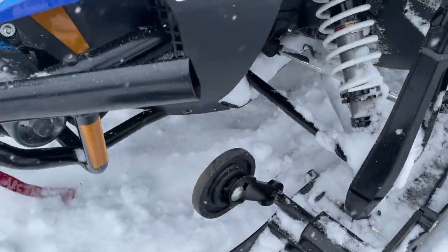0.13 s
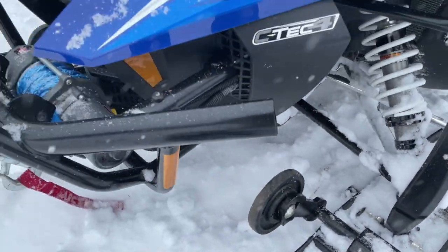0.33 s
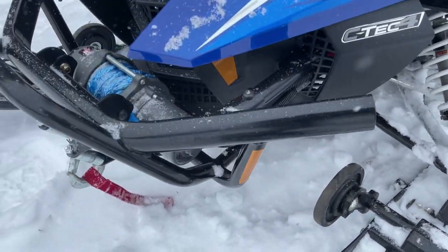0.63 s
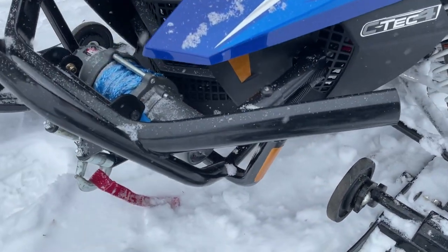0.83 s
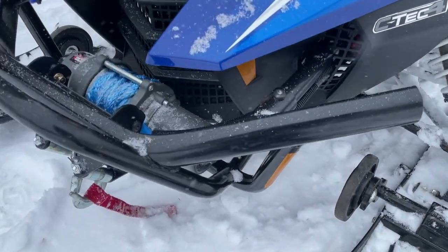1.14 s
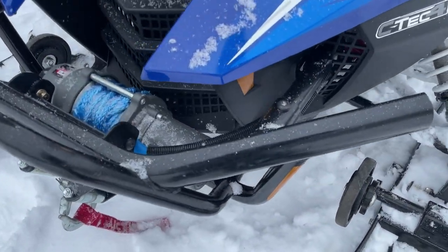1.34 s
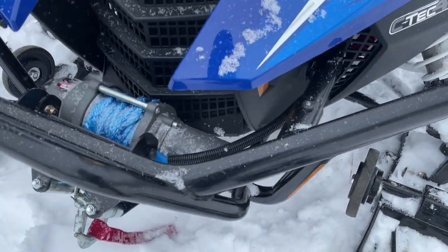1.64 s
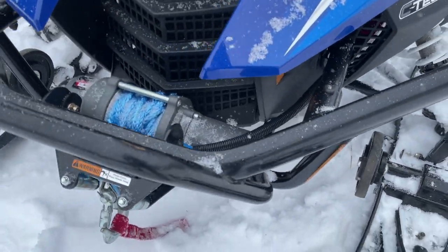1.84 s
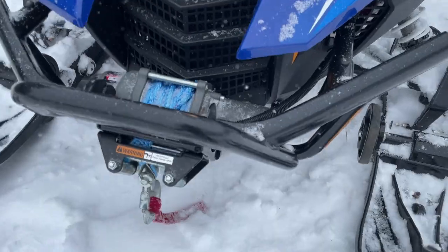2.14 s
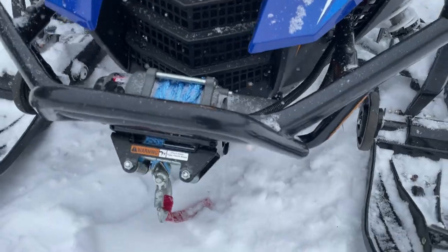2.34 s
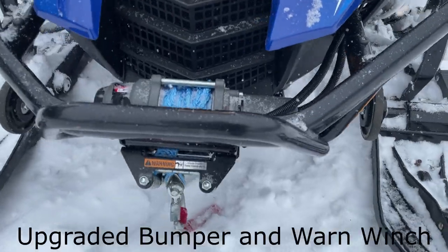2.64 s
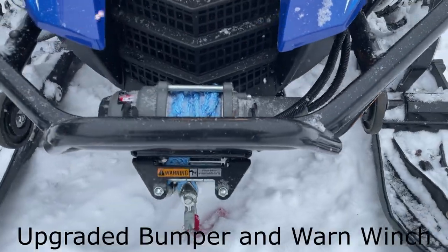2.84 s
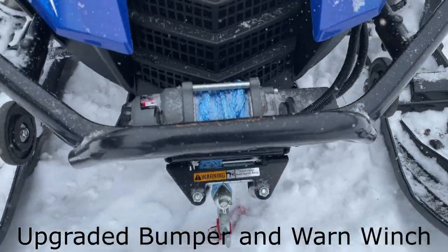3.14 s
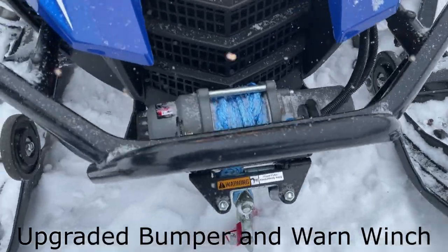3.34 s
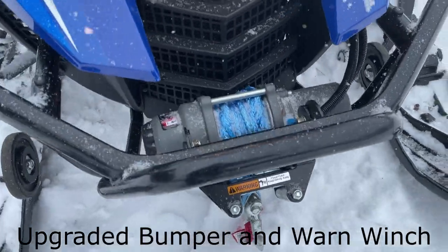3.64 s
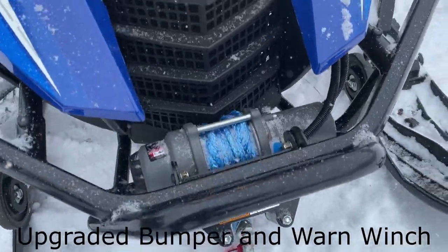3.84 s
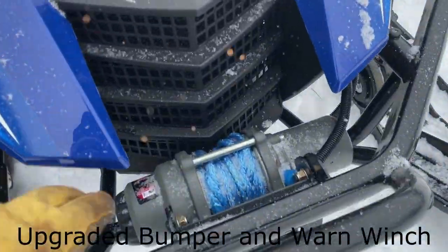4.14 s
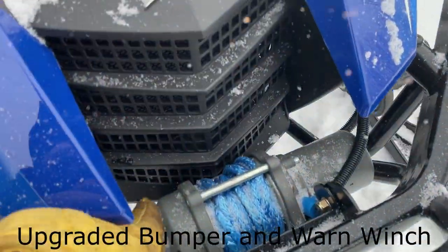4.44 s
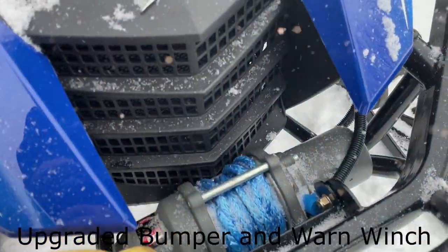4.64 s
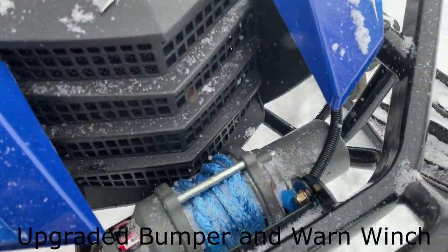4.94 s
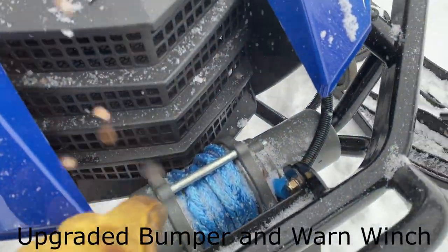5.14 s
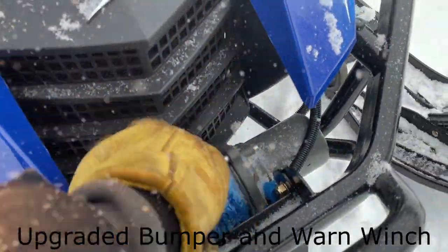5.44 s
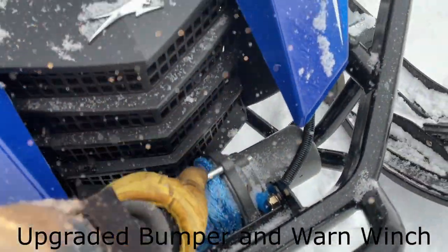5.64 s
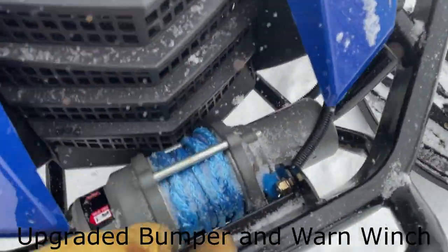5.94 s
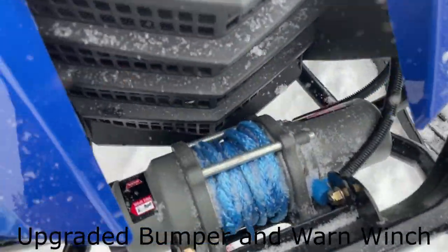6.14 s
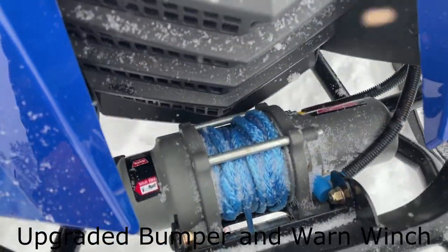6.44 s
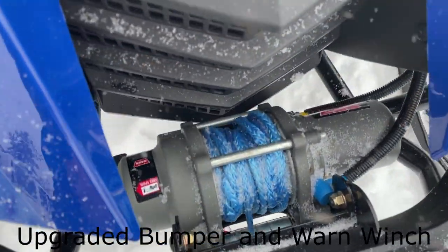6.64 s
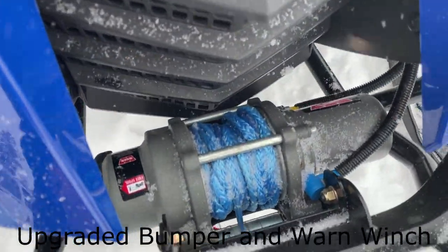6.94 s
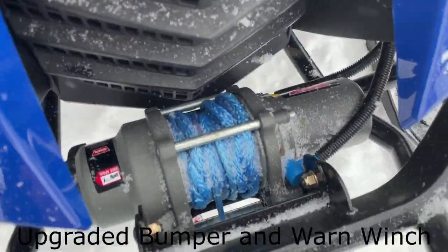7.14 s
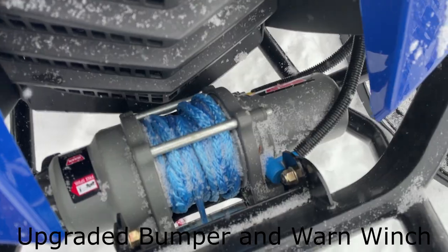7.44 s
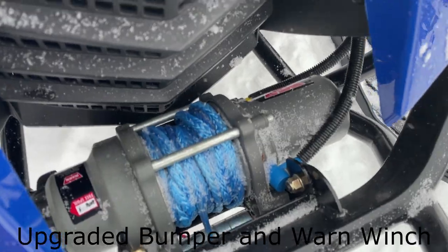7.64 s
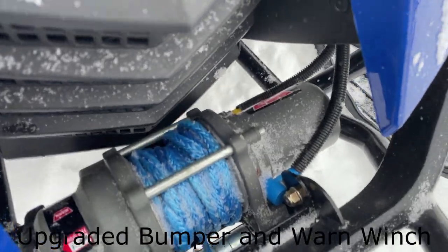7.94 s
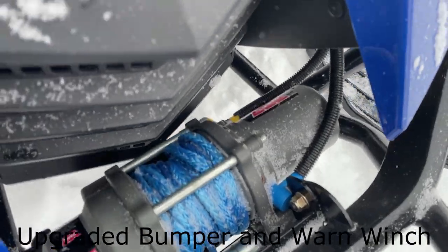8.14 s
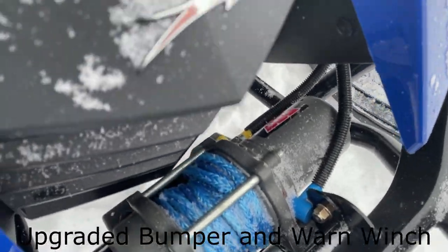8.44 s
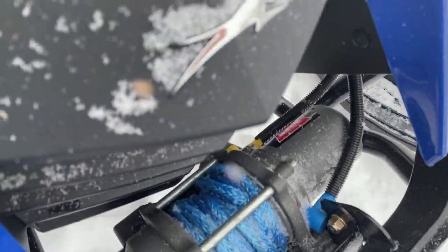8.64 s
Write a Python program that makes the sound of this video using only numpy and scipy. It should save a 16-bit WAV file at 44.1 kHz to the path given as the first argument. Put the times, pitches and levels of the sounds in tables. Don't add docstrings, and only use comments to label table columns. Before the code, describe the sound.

A four-stroke snowmobile idles throughout, close to a hand-held stereo microphone outdoors on snow. The exhaust is a deep, dense throb of about 37 to 38 pulses a second, slightly lumpy, with small sags as firings weaken. Over it lie quick dry valve clatter, ringing hood panels, intake hiss, a thin faint pump whine that comes and goes, and soft low wind. From 0 to 1.3 s several small loose rattles tick; a side-vent hiss fades as the microphone leaves the flank. Until about 3.6 s it swings to the nose, uncovering more casing ring and clatter. A few faint ticks fall at 3.3 to 3.9 s. At 5.6 s a glove flicks the winch rope: one short, bright snap with a tiny drum knock. From 6 s the microphone leans over the grille, the clatter nearer and brighter, with sparse light ticks until the end at 8.8 s, still idling.

```python
import sys
import numpy as np
from scipy import signal
from scipy.fft import rfft, irfft, next_fast_len
from scipy.io import wavfile
from scipy.ndimage import map_coordinates

SR = 44100
rng = np.random.default_rng(int(sys.argv[2]) if len(sys.argv) > 2 else 0)


def attenuation_scalar(level_db):
    decades = np.asarray(level_db, float) / 20
    return 10 ** decades


def transcribe(signal):
    frames = np.atleast_2d(signal).T
    limited = np.clip(frames, -1, 1)
    pcm = np.round(limited * 32767).astype(np.int16)
    wavfile.write(sys.argv[1], SR, pcm)


N = 387638

# time in seconds, firing rate in Hz.
IDLE_HZ = [(0.0, 37.59), (0.63, 38.1), (1.15, 37.76), (1.32, 38.38), (2.35, 38.63), (3.06, 37.72),
           (3.57, 38.86), (4.19, 37.03), (4.85, 37.75), (5.37, 37.85), (5.62, 37.26), (6.8, 39.16),
           (6.97, 37.96), (7.71, 37.62), (8.47, 38.97), (8.79, 36.77)]
# time in seconds, firing rate lost in Hz.
STUMBLES_HZ = [(0.353, 0.71), (1.038, 1.91), (1.26, 1.12), (1.68, 2.03), (1.868, 1.23), (2.026, 2.55),
               (2.235, 2.07), (2.434, 2.09), (2.602, 2.21), (3.021, 1.1), (3.44, 2.02), (3.578, 4.42),
               (3.725, 1.34), (4.209, 0.32), (5.237, 1.37), (5.865, 1.35), (6.303, 1.85), (6.488, 3.25),
               (6.663, 1.09), (6.874, 1.81), (7.31, 1.3), (7.496, 1.49), (7.961, 1.71), (8.112, 1.94),
               (8.241, 3.36), (8.518, 1.47)]
# strength in dB, lateness in firing intervals, extra level of the upper orders in dB.
CYLINDERS = [
    (-0.78, 0.0018, 0.88),
    (-0.46, -0.0058, 0),
    (-0.35, 0.0013, -2),
]
# resonance in Hz, width in Hz, level in dB.
SILENCER = [(89.79, 32.56, 8), (94.2, 26.49, 9), (150, 13.3, -31), (212.25, 15.1, -12),
            (282.8, 15.4, -27.5)]
# resonance in Hz, width in Hz, level in dB, delay in seconds.
TAILPIPE = (432, 90, -40.5, .008)
# time in seconds, swing flank to nose 0-1, lean over grille 0-1, grille approach in dB.
CAMERA = [(0, 0, 0, 0), (.5, .15, 0, 0), (1.1, .3, 0, .3), (1.7, .5, 0, .8), (2.3, .68, 0, 1.3),
          (2.8, .87, 0, 1.8), (3.6, 1, 0, 2.8), (5.95, 1, 0, 4.8), (6.25, 1, .62, 5), (7.6, 1, .72, 6.6),
          (8.79, 1, 1, 7)]
# share of the cycle 0-1, level in dB.
VALVES = [(0.059, 15), (0.132, -18), (0.218, 5), (.28, 11.5), (0.418, 13), (.48, 14.5), (.56, 9), (.62, 14),
          (.74, 10), (.8, 7), (0.872, 2.5), (0.929, 10)]
# frequency in Hz, density in dB per Hz.
BLOCK_DB = [(30, -38), (120, 4.5), (300, -6.5), (430, -9), (570, -20), (700, -7), (870, -13), (1000, -11),
            (1300, -8), (2000, -9.5), (2600, -12), (3500, -18), (5000, -22.5), (7500, -38.5), (12000, -47)]
# resonance in Hz, width in Hz, level in dB.
CASING = [(364, 63, -6), (432, 52, -3.5), (540, 9, 4.5), (637, 46, -2.5), (734, 28, -13.5), (992, 33, -0.5),
          (1476, 140, -8), (1717, 51, 7)]
# resonance in Hz, width in Hz, likeness of the ports 0-1, left excess in dB,
# share of the band owed to other parts in dB.
PANELS = [(782, 45, .8, 4, -43), (1120, 75, .7, 4, -42), (1545, 150, .7, 1, -42), (1850, 62, .8, 0, -44)]
# level at the flank in dB, change per swing in dB, change per lean in dB,
# lobe height in dB, swing aimed at 0-1.
PANEL_BEAMS = [(-45.5, 5, -.5, 7.5, .38), (-37.5, -.5, 1.5, -2.5, .62), (-37.5, 3.5, -1.2, 0, .5),
               (-45, 9, -2.5, -5, .6)]
PANEL_LEAD_RAD = [(.8, .5, .4), (.1, 1.1, -.2), (-.2, -3.2, -2.8), (-1.4, -.2, 4.6)]
# share of the cycle 0-1, favour in dB.
PANEL_NEAREST = [(.46, 2.5), (.55, 1), (.72, 2.5), (.17, 1.5)]
# frequency in Hz, density in dB per Hz.
INTAKE_DB = [(2000, 0), (5000, -7), (6500, -0.5), (7500, -3), (8700, 0), (10000, -3), (12000, -2),
             (13500, -6), (15500, -18)]
# frequency in Hz, level in dB.
PUMP = [
    (2083, -81),
    (2186, -57),
]
# time in seconds, peak in dB, ring in Hz.
TICKS = [(0.1321, -30, 3280), (0.2229, -19.5, 3950), (0.2952, -21, 3400), (0.3735, -22, 4230),
         (0.6918, -34, 3320), (0.8719, -23, 3420), (0.9263, -24, 3080), (1.262, -22, 3350),
         (3.329, -25, 3280), (3.5778, -30, 3410), (3.8716, -30, 4100), (6.0107, -27, 3320),
         (6.0921, -29, 3980), (6.4652, -33, 4130), (6.7181, -26, 3330), (7.2609, -29, 3310),
         (7.6221, -31, 3740), (7.9059, -29, 3470), (8.0701, -29, 3070), (8.1803, -30, 3420)]
# time in seconds, crack level in dB.
FLICK = (5.5996, -17.5)
# frequency in Hz, level in dB, decay t60 in seconds.
DRUM = [(680, -14.5, .04), (2500, -15.5, .022), (2850, -18, .022), (3150, -15.5, .022), (3700, -18, .02),
        (7200, -28, .012), (11850, -19, .014), (12900, -24, .014)]
# frequency in Hz, density in dB per Hz.
BREEZE_DB = [(15, -19), (30, -17), (50, 12.5), (100, 5.5), (200, -5), (400, -40)]
# frequency in Hz, likeness 0-1.
PORT_LIKENESS = [(300, .98), (700, .9), (1000, .7), (1300, .4), (1600, .6), (2200, .6), (3500, .35),
                 (5500, .45), (7000, .65), (8600, .96), (10000, .7), (12000, .72), (13500, .995)]
# frequency in Hz, phase in radians.
PORT_LEAD_RAD = [(0, 0), (700, 1.1), (1300, 2), (1500, 2.7), (1800, 4.6), (2200, 6.5), (2800, 8),
                 (3500, 12.5), (4500, 13.3), (5500, 11.5), (7000, 10.4), (8600, 9.4), (10000, 8.6),
                 (12500, 7), (13500, 6.28)]
# frequency in Hz, level in dB.
PORT_TILT_DB = [(200, 1), (400, 1.5), (700, 4), (1100, 4.5), (1600, 1), (2400, 0), (4400, 1.5), (7000, 1.5),
                (9000, 0), (15000, 0)]

LEFT_RIGHT = np.array([[.5], [-.5]])
COARSE = 8
SAG_S = .065
MEAN_RATE_HZ, BOOM_DB_PER_HZ = 37.5, .5
PIPE_LEAD = .32
BEAM_SWING = .36
CLATTER_DB, HISS_DB, HISS_DB_PER_SWING, HISS_DB_PER_LEAN = -44, -47, 3.5, -.5
VENT_DB, VENT_SWING = 5, 0.1
SHADE_DB, SHADE_SWING = -3.5, 0.13
TOP_HZ = 15530


def along(points, hz):
    f, v = np.transpose(points)
    return np.interp(np.log(hz + 50), np.log(f + 50), v)


def unit(x):
    return x / np.sqrt(np.mean(x ** 2) + 1e-20)


def curves(rows):
    s, *cols = np.transpose(rows)
    return [np.interp(np.arange(N) / SR, s, c) for c in cols]


def wobble(rate_hz):
    knots = rng.standard_normal(int(N * rate_hz / SR) + 4)
    return map_coordinates(knots, [np.arange(N) * rate_hz / SR])


def filtered(x, response):
    m = next_fast_len(N + SR // 2)
    return irfft(rfft(x, m) * response(np.fft.rfftfreq(m, 1 / SR)), m)[..., :N]


def mode(f, hz, width_hz):
    return 1j * f * width_hz / (hz * hz - f * f + 1j * f * width_hz)


def modes_alternating(f, rows):
    return sum((-1) ** k * attenuation_scalar(db) * mode(f, hz, width_hz) for k, (hz, width_hz, db) in enumerate(rows))


def moved(start, per_swing, per_lean):
    swing, lean, _ = curves(CAMERA)
    return start + per_swing * swing + per_lean * lean


def shade():
    swing = curves(CAMERA)[0]
    return attenuation_scalar(SHADE_DB * np.exp(-(swing / SHADE_SWING) ** 2))


def speed():
    t = np.arange(N) / SR
    sag_hz = sum(lost_hz * np.exp(-((t - s) / SAG_S) ** 2) for s, lost_hz in STUMBLES_HZ)
    return curves(IDLE_HZ)[0] - sag_hz


def exhaust(rate_hz, turns, jitter, wander, flutter_db, follow):
    strength_db, late, bright_db = np.transpose(CYLINDERS)
    lag_s = moved(.15, .16, .04)[::COARSE] / 1000
    pan_db = moved(1, .65, .1)[::COARSE]
    felt_hz = (37.25 + follow * (rate_hz - 37.5))[::COARSE]
    swell_db = BOOM_DB_PER_HZ * (rate_hz - MEAN_RATE_HZ)[::COARSE]
    crank = turns + PIPE_LEAD + jitter * wobble(30) + wander * wobble(11)
    angle = 2 * np.pi * crank[::COARSE]
    hidden = shade()[::COARSE]
    grid_hz = np.linspace(33, 42, 40)
    boom = np.zeros((2, len(felt_hz)))
    for order in np.arange(1, 54) / 3:
        blows = attenuation_scalar(strength_db + bright_db * min(order / 5.5, 1) ** 3)
        feed = np.mean(blows * np.exp(-2j * np.pi * order * (np.arange(3) + late)))
        answer = feed * silencer(order * grid_hz)
        flutter = attenuation_scalar(flutter_db * order ** .5 * wobble(13)[::COARSE])
        level = np.interp(felt_hz, grid_hz, np.abs(answer)) * flutter
        phase = np.interp(felt_hz, grid_hz, np.unwrap(np.angle(answer)))
        lead = LEFT_RIGHT * 2 * np.pi * order * felt_hz * lag_s
        boom += level * (hidden if order > 8.5 else 1) * np.cos(order * angle + phase + lead)
    boom = boom * attenuation_scalar(LEFT_RIGHT * pan_db + swell_db)
    boom = signal.resample_poly(boom, COARSE, 1, axis=1, padtype="line")[:, :N]
    return attenuation_scalar(2.5 + moved(-.6, .6, .1)) * boom


def silencer(f):
    open_end = (1j * f / (41.8 + 1j * f)) ** 2
    soft_edge = np.exp(-(f / 400) ** 4)
    hz, width_hz, db, delay_s = TAILPIPE
    late = attenuation_scalar(db) * mode(f, hz, width_hz) ** 2 * np.exp(-2j * np.pi * f * delay_s)
    return modes_alternating(f, SILENCER) * open_end * soft_edge + late


def moments(turns, marks):
    return np.interp(marks, turns, np.arange(N), left=-1, right=-1)


def spikes(at, size):
    keep = (at >= 0) & (at < N - 1)
    return np.bincount(np.round(at[keep]).astype(int), size[keep], N)


def contacts(turns, scatter_db, jitter):
    share, level_db = np.transpose(VALVES)
    marks = 3 * (np.arange(130)[:, None] + share)
    chance = rng.standard_normal((marks.size, 2))
    size = attenuation_scalar(np.tile(level_db, len(marks)) + scatter_db * chance[:, 0])
    return spikes(moments(turns, marks.ravel() + jitter * chance[:, 1]), size)


def valve_gear(turns, scatter_db, t60_s):
    t = np.arange(SR // 8) / SR
    blow = attenuation_scalar(-60 * t / t60_s) * (1 - np.exp(-t / 0.00098))
    return unit(signal.fftconvolve(contacts(turns, scatter_db, 0.029), blow)[:N])


def gated(turns, steady, scatter_db, t60_s):
    beat = steady + valve_gear(turns, scatter_db, t60_s)
    firing_db = .8 * np.cos(2 * np.pi * (turns - .45))
    cycle_db = .9 * np.cos(2 * np.pi * (turns / 3 - .05))
    gain = attenuation_scalar(firing_db + cycle_db + 0.77 * wobble(7))
    return unit(beat * gain * rng.standard_normal((2, N)))


def machinery(turns):
    swing, _, approach_db = curves(CAMERA)
    near_db = CLATTER_DB + approach_db
    vent_db = VENT_DB * np.exp(-swing / VENT_SWING)
    hiss_db = moved(HISS_DB, HISS_DB_PER_SWING, HISS_DB_PER_LEAN) + vent_db
    low = lambda f: 1 / (1 + (f / 1900) ** 4)
    block = filtered(gated(turns, 4.0, 1.9, 0.022), lambda f: attenuation_scalar(along(BLOCK_DB, f)) * low(f))
    block = shade() ** .5 * attenuation_scalar(0.47 * (near_db + 47) - 29.0) * unit(block)
    grille = filtered(gated(turns, .9, 3, .05), lambda f: attenuation_scalar(along(BLOCK_DB, f)) * (1 - low(f)))
    grille = attenuation_scalar(near_db + vent_db / 2 + 3) * unit(grille)
    hiss = filtered(gated(turns, 2.3, 8.3, 0.13), lambda f: attenuation_scalar(along(INTAKE_DB, f)))
    hiss = attenuation_scalar(hiss_db + 2) * unit(hiss)
    return block + grille + hiss


def hood(turns):
    swing = curves(CAMERA)[0]
    out = np.zeros((2, N))
    for panel, beam, bearing, nearest in zip(PANELS, PANEL_BEAMS, PANEL_LEAD_RAD, PANEL_NEAREST):
        hz, width_hz, alike, pan_db, rest_db = panel
        *slope, lobe_db, aim = beam
        share, favour_db = nearest
        db = moved(*slope) + lobe_db * np.exp(-((swing - aim) / BEAM_SWING) ** 2)
        lead = moved(*bearing)
        repeat = unit(np.array([contacts(turns, 1.5, .003), contacts(turns + .17, 1.5, .003)]))
        favour = attenuation_scalar(favour_db * np.cos(2 * np.pi * (turns / 3 - share)))
        drive = (.9 * repeat + gated(turns, 1.2, 2.5, .05)) * favour
        rung = unit(filtered(drive, lambda f: mode(f, hz, width_hz) ** 2))
        a, b = signal.hilbert(rung, next_fast_len(N))[:, :N]
        mix = np.arccos(np.clip(alike, 0, 1)) / 2
        mid, side = np.cos(mix) * a, np.sin(mix) * b
        pair = np.array([mid + side, mid - side])
        own = np.sqrt(np.maximum(attenuation_scalar(db) ** 2 - attenuation_scalar(rest_db) ** 2, 1e-6))
        out += own * attenuation_scalar(1.0 + LEFT_RIGHT * pan_db) * (pair * np.exp([.5j * lead, -.5j * lead])).real
    return out


def chug(turns):
    casing = lambda f: modes_alternating(f, CASING) / (1 + (f / 1800) ** 4)
    nearer_db = .5 * (curves(CAMERA)[2] - 3)
    rung = unit(filtered(contacts(turns, scatter_db=1.5, jitter=.003), casing))
    return shade() * attenuation_scalar(nearer_db - 33.5) * rung


def pump():
    t = np.arange(N) / SR
    out = np.zeros(N)
    for hz, db in PUMP:
        level = attenuation_scalar(db + 6.5 + 6.1 * wobble(5.6))
        cycles = hz * t + np.cumsum(7 * wobble(1.5)) / SR
        out += level * np.sin(2 * np.pi * cycles)
    return out


def ring(modes, crack_db, crack_t60_s):
    t = np.arange(SR // 10) / SR
    tones = np.zeros(len(t))
    for hz, db, t60_s in modes:
        tones += attenuation_scalar(db - 60 * t / t60_s) * (1 - np.exp(-t * hz / 0.5)) * np.sin(2 * np.pi * hz * t)
    noise = np.convolve(rng.standard_normal(len(t) + 3), [.6, .3, -.3, -.6], "valid")
    return tones + attenuation_scalar(crack_db - 60 * t / crack_t60_s) * noise


def knocks():
    out = np.zeros(N + SR)
    for s, db, hz in TICKS:
        out[round(s * SR):][:SR // 10] += ring([(hz, db - 9, .015)], db - 11, 0.032)
    flick_s, crack_db = FLICK
    out[round(flick_s * SR):][:SR // 10] += ring(DRUM, crack_db, 0.025)
    return out[:N]


def ports(pair):
    mix = lambda f: np.arccos(np.clip(along(PORT_LIKENESS, f), 0, 1)) / 2
    mid, side = filtered(pair, lambda f: np.array([np.cos(mix(f)), np.sin(mix(f))]))
    half = lambda f: attenuation_scalar(along(PORT_TILT_DB, f) / 2) * np.exp(.5j * along(PORT_LEAD_RAD, f))
    return filtered(np.array([mid + side, mid - side]), lambda f: np.array([half(f), 1 / half(f)]))


def breeze():
    wind = unit(filtered(rng.standard_normal((2, N)), lambda f: attenuation_scalar(along(BREEZE_DB, f))))
    a, b = wind * attenuation_scalar(4 * wobble(4))
    return attenuation_scalar(-35) * np.array([a + .15 * b, a - .15 * b])


def scene():
    rate_hz = speed()
    turns = np.cumsum(rate_hz) / SR + 2.72
    boom = exhaust(rate_hz, turns, jitter=0.003, wander=.008, flutter_db=0.26, follow=0.28)
    point = pump() + knocks() + chug(turns)
    under_hood = ports(machinery(turns) + point * [[1], [.3]]) + hood(turns)
    return boom + under_hood + breeze()


def roll_off(x):
    return signal.sosfilt(signal.butter(12, 15600, fs=SR, output="sos"), x)


def record(dry):
    soft = dry / (1 + np.abs(dry / 1.02) ** 7) ** (1 / 7)
    mix = filtered(soft, lambda f: f < TOP_HZ)
    return roll_off(mix)


dry = scene()
out = record(dry)
transcribe(out)
```